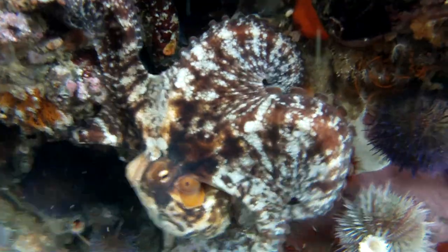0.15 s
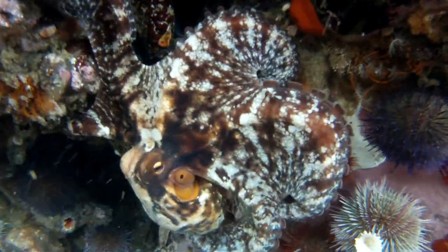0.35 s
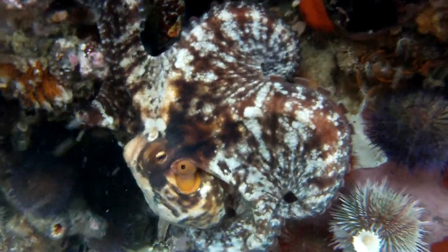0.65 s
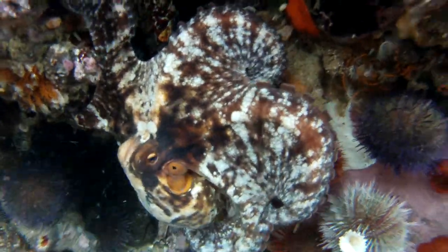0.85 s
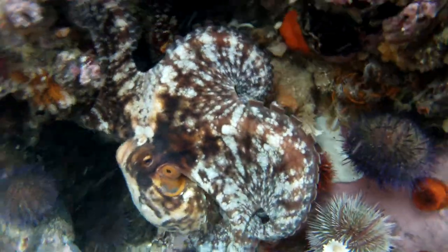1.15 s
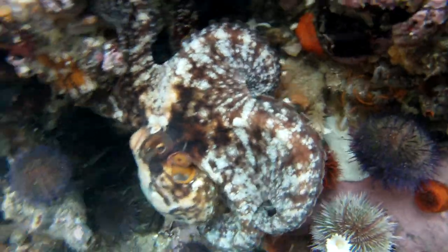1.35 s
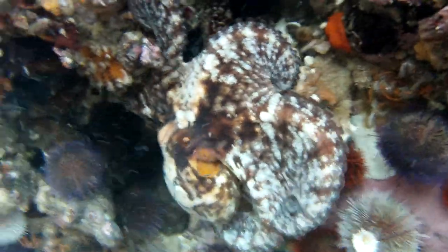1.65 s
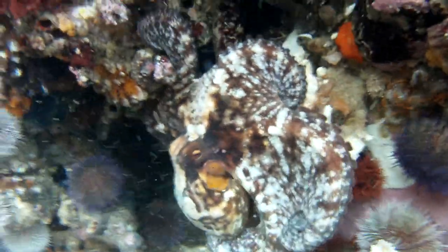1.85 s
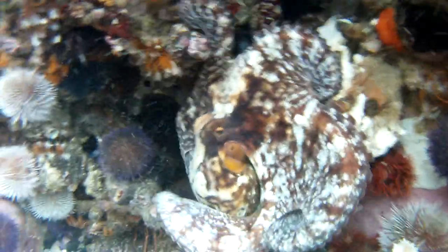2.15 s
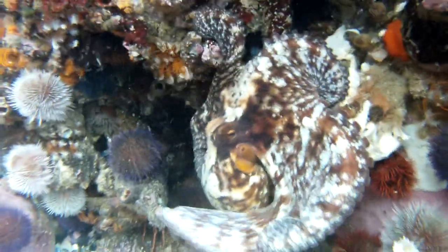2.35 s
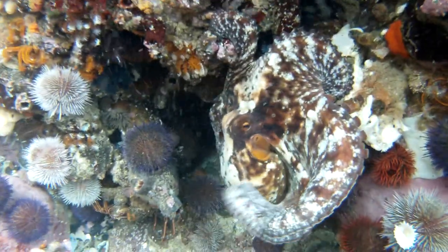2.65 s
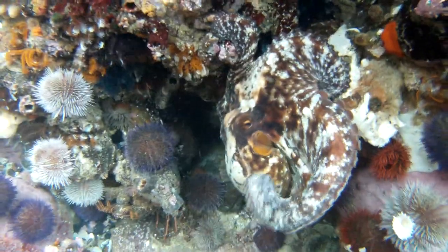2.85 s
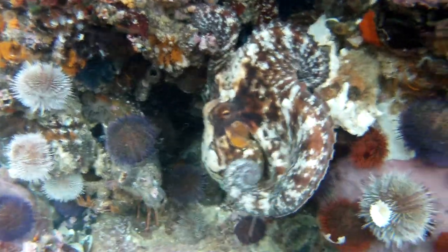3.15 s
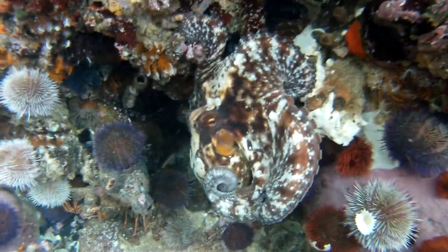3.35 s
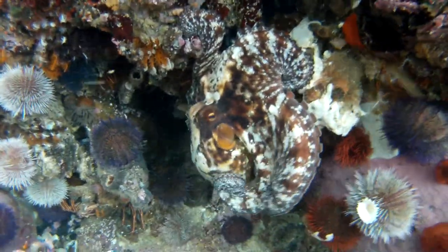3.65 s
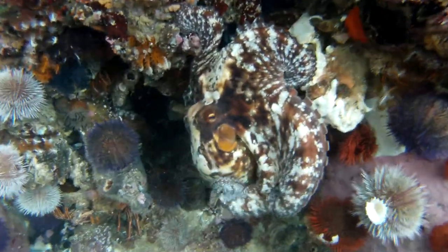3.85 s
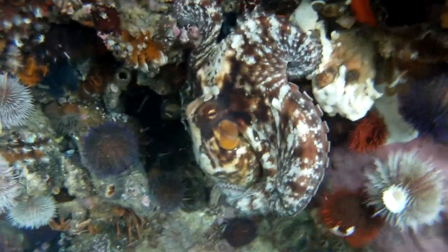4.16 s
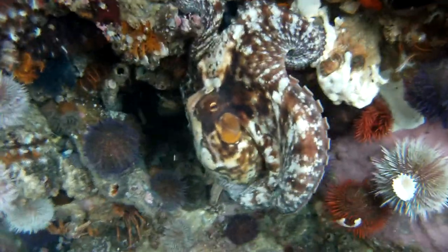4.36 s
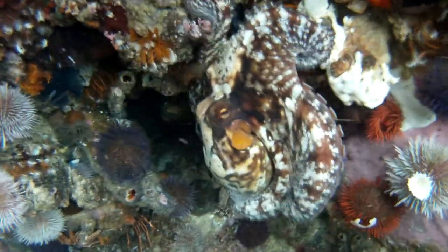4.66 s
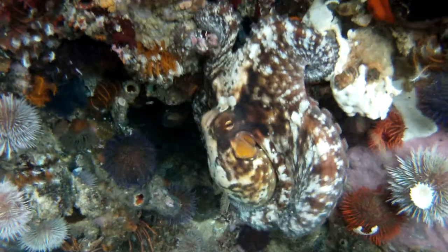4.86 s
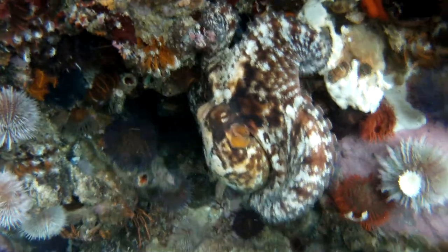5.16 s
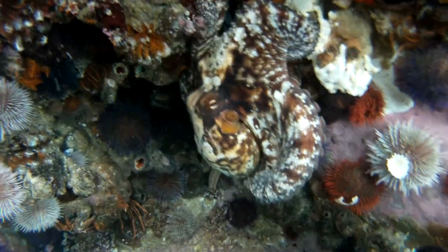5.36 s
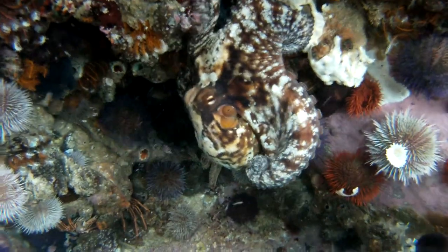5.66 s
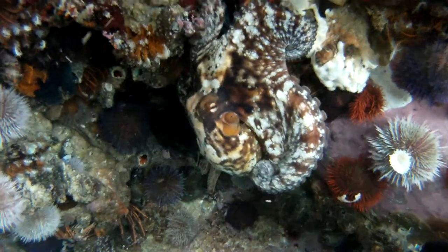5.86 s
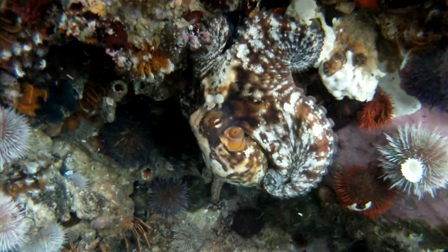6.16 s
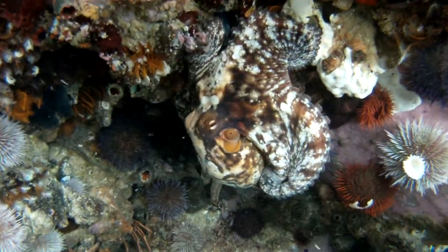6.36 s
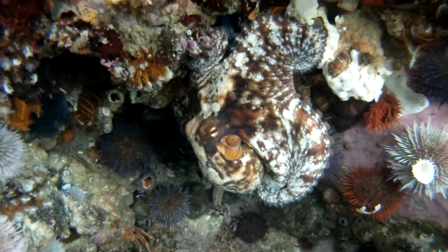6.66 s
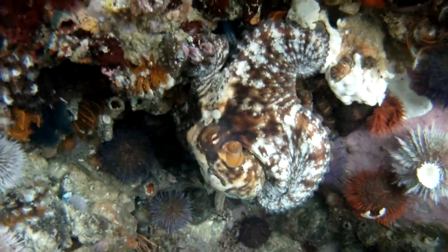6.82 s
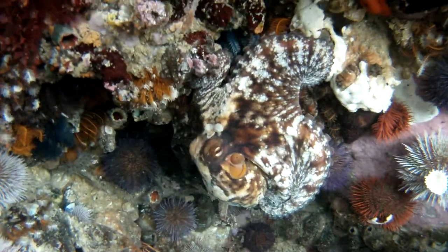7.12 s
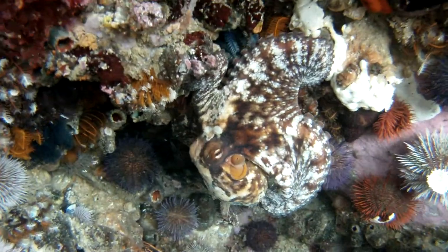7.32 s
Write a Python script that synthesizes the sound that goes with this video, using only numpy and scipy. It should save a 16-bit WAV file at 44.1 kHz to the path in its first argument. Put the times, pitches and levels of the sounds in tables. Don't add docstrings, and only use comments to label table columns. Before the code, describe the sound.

Quiet rocky reef, close and muffled, almost mono, with the gritty, metallic edge of a low-quality recorder. Water rumbles and gurgles under hiss and fine crackling. Hands knock softly on the housing and a rubber seal creaks and chirps at the start. Irregular shrimp snaps ring the walls, some nearer, and one very close crack stands far above everything before it calms to gurgling and sparse ticks.

```python
import sys
import numpy as np
from scipy import signal
from scipy.fft import rfft, irfft
from scipy.io import wavfile
from scipy.ndimage import uniform_filter1d

SR = 44100
rng = np.random.default_rng(int(sys.argv[2]) if len(sys.argv) > 2 else 0)


def gain_from_db(level_db):
    decades = np.asarray(level_db, float) / 20
    return 10 ** decades


def output_pcm(signal):
    pcm = np.clip(np.atleast_2d(signal).T, -1, 1) * 32767
    wavfile.write(sys.argv[1], SR, np.round(pcm).astype(np.int16))


N = 330287
TIME = np.arange(N) / SR

# (frequency [Hz], level [dB per Hz])
HISS = [(20, -91.5), (120, -93.5), (300, -93), (700, -99), (1400, -102), (2800, -105), (4500, -106),
        (7000, -106)]
# (frequency [Hz], level [dB per Hz])
SIDE_HISS = [(20, -118), (150, -113), (1000, -114), (7000, -114)]
# (time [s], level [dB])
REEF_LEVEL = [(0, -68.5), (1, -72), (2.4, -72), (2.8, -69.5), (3.6, -66.5), (4.2, -67.5), (4.7, -65),
              (5, -73.5), (6, -71), (7.49, -74.5)]
# (time [s], level [dB])
SURGE_LEVEL = [(0.0, -61), (0.44, -63.5), (1.08, -55.5), (2.06, -64.5), (2.23, -60.5), (2.67, -65),
               (2.92, -57), (3.04, -59.5), (3.69, -62), (3.88, -58), (4.25, -61), (4.67, -58.5),
               (4.94, -64), (5.65, -61.5), (6.28, -65), (7.49, -64.5)]
# (middle [s], length [s], wash lift [dB], gurgle lift [dB])
EDDIES = [(.55, .3, -1, 2), (1.2, 0.47, 6, -1.5), (2.28, 0.15, 4, 5), (3.05, .25, -3, 1.5),
          (3.8, 0.42, 4, -1), (4.2, .45, 7.5, 0), (4.7, .7, 2.5, 6.5), (5.22, .25, 5, 8.5),
          (5.6, .4, 5, 8.5), (5.9, 0.23, 5.5, 9.5), (7.3, 0.77, 7.5, 5)]
# (frequency [Hz], level [dB], time to fall 60 dB [s])
SEAL_MODES = [(234, -5.5, 0.034), (567, -9, 0.035), (878, 0, 0.03), (1110, -2, 0.014), (1570, -15, 0.019)]
# (start [s], length [s], level [dB], slips [per s])
CREAKS = [
    (.535, 0.075, -57, 126),
    (.634, 0.02, -58, 130),
    (.667, 0.013, -62, 115),
    (.699, 0.041, -60, 118),
    (0.953, 0.039, -58.5, 118),
    (1.01, 0.018, -59.5, 114),
    (1.127, .032, -63.5, 130),
]
# (time [s], peak [dB], start pitch [Hz], end pitch [Hz], length [s])
SQUEAKS = [(.443, -56, 1090, 1000, .03), (.466, -51, 900, 840, .038), (.503, -55, 1130, 1010, .042),
           (.912, -59, 1200, 1080, .028), (1.15, -57, 800, 690, .028), (1.165, -63, 1700, 2300, .025),
           (1.187, -48, 770, 960, .027), (1.198, -52, 1000, 1130, .018), (.97, -57, 95, 110, .3),
           (3.72, -53, 52, 72, .3), (4.05, -51, 82, 68, .3)]
# (time [s], peak [dB], frequency [Hz], swell time [s])
KNOCKS = [(.146, -38, 140, 0.0032), (0.1768, -29, 144, 0.003), (0.386, -49, 108, .005),
          (0.389, -49, 302, 0.0023), (2.239, -32.5, 163, 0.005), (2.238, -50, 300, 0.0022),
          (4.077, -48, 290, 0.0045), (2.273, -42, 70.4, 0.0049), (2.259, -51, 242, 0.0078),
          (2.96, -45, 94, 0.0078), (3.453, -45, 99, 0.0053), (3.991, -46, 60.4, 0.0054),
          (4.075, -32.5, 153, 0.003), (4.49, -48, 111, .008), (4.70, -49, 158.5, 0.0088),
          (4.862, -44, 187, .006), (5.08, -49, 224, .008), (5.204, -59, 180, .006),
          (5.53, -52.5, 200.2, 0.0066), (5.81, -55.5, 202, 0.009), (6.53, -47, 70, 0.0066)]
# (frequency [Hz], level [dB], time to fall 60 dB [s])
WALL_MODES = [(600, -14, .04), (900, -15, .022), (1090, -14, .02), (1550, -15, .014), (1950, -8, .012),
              (2450, -6, .010), (2720, -.5, .011), (3350, -2.5, .010), (3520, -1.5, .011), (3780, -3, .010),
              (4300, -5, .008), (4850, -7, .008), (5200, -9, .007), (5560, -4, .008)]
# (time [s], peak [dB], centre [Hz], burst length [s])
RASPS = [
    (0.431, -53, 2100, .004),
    (0.635, -50, 900, .001),
    (.6995, -51, 900, .001),
    (.903, -55.5, 1390, .012),
    (0.927, -61, 1500, .0065),
    (.9535, -50, 900, .001),
    (1.132, -54, 1050, 0.0071),
    (1.168, -59, 2000, .01),
    (1.187, -59, 1500, .008),
]
# (time [s],
# peak [dB], centre [Hz], burst length [s])
TAPS = [(0.394, -54, 619, .0033), (0.43, -48.5, 600, 0.0024), (3.153, -48, 600, .0089),
        (3.644, -49, 552, .0033), (3.71, -44.5, 630, 0.0034), (3.976, -50.5, 589, .003),
        (4.045, -46, 606, 0.0014), (5.212, -54, 458, 0.0032), (5.421, -55, 546, 0.0023),
        (6.536, -57, 673, .0033), (4.934, -36.5, 641.5, .001)]
# (time [s], peak [dB], centre [Hz], bare crack [dB])
TICKS = [
    (0.327, -57.5, 3340, 4),
    (0.4863, -48.5, 3750, 3),
    (1.527, -62, 3110, 15),
    (2.06, -50, 3460, 12),
    (2.094, -58, 3390, 8),
    (2.219, -65, 4140, 4),
    (3.5324, -39.5, 3530, 0),
    (5.1175, -45.5, 3500, 15.5),
    (6.169, -57, 3010, 4),
    (6.87, -48, 3900, 10.5),
]
# (time [s], peak [dB], centre [Hz], bare crack [dB])
SNAPS = [(0.7158, -44.5, 3630, -7), (0.81, -57, 3230, -7), (1.123, -56.5, 2650, -9),
         (1.1717, -51, 3360, 11), (1.197, -55, 2610, -7), (1.8804, -55, 2420, -7), (2.0328, -48, 3300, -4),
         (2.3433, -44.5, 3450, -13), (2.802, -41, 3570, 0), (4.013, -51, 2600, -5), (4.0731, -52, 2670, -7),
         (4.641, -49, 2600, -6.5), (4.778, -50, 2540, 6.5), (4.8817, -41.5, 2640, 3),
         (5.4294, -58, 2507, -7), (5.663, -51, 3480, 11), (6.6498, -51.5, 3350, -7)]
# (time [s], peak [dB], centre [Hz], spread [octaves], burst length [s])
NEAR_SNAPS = [(3.093, -48, 3000, .6, .002), (3.0949, -30.5, 3300, 0.92, 0.0043),
              (3.103, -40, 3600, .44, .0015), (3.111, -44, 3000, .8, .0012),
              (3.9764, -27.5, 3680, 0.37, 0.00035), (3.9768, -30, 2620, 0.23, 0.00054),
              (3.984, -48, 2650, .2, .002), (4.0437, -34.5, 2420, 0.28, 0.0011),
              (4.044, -41, 1500, 0.37, 0.0016), (3.9782, -37.5, 1860, 0.27, 0.00055),
              (3.9772, -40.5, 3960, .12, 0.0007), (3.096, -45.5, 1900, 0.2, 0.0022)]
# (time [s], level [dB])
CLOSE_BLOWS = [
    (4.93355, 0),
    (4.93456, -9.8),
    (4.93538, -18),
    (4.93603, -12.5),
]
# (frequency [Hz], level [dB], time to fall 60 dB [s], first swing [+1 or -1])
CLOSE_MODES = [(650, -13.9, .003, -1), (912, -23, .036, 1), (1079, -10.8, .0164, 1), (1501, -30.7, .03, 1),
               (2062, -33, .035, 1), (2455, -14.2, .0188, -1), (2565, -4.4, .0202, -1),
               (3243, -9.6, .0123, 1), (3457, -2.2, .0266, -1), (3734, -9.8, .0098, 1),
               (4250, -22, .014, -1), (5160, -9, .006, -1), (5461, -12, .012, 1), (5750, -8, .008, -1)]


def curve(table):
    return np.interp(TIME, *np.transpose(table))


def coloured(points):
    hz, db = np.transpose(points)
    bins = np.arange(N // 2 + 1) * SR / N + 1
    shape = gain_from_db(np.interp(np.log(bins), np.log(hz), db))
    return irfft(rfft(rng.standard_normal(N)) * shape, N) * np.sqrt(SR / 2)


def ring(x, modes):
    out = np.zeros(len(x))
    for k, (hz, db, t60) in enumerate(modes):
        decay = np.exp(-np.log(1000) / (t60 * SR))
        turn = 2 * np.pi * hz / SR
        feedback = [1, -2 * decay * np.cos(turn), decay * decay]
        out += (-1) ** k * gain_from_db(db) * signal.lfilter([0, decay * np.sin(turn)], feedback, x)
    return out


def band(x, lo_hz, hi_hz):
    y = signal.sosfilt(signal.butter(2, [lo_hz, hi_hz], "bandpass", fs=SR, output="sos"), x)
    return y / np.sqrt(np.mean(y ** 2))


def add(track, s, sound, db):
    i = int(s * SR)
    track[i:i + len(sound)] += (gain_from_db(db) * sound / np.abs(sound).max())[:N - i]


def grains(rate, scatter_db):
    size = np.minimum(rng.exponential(size=N), 3)
    return (rng.random(N) < rate / SR) * rng.standard_normal(N) * gain_from_db(scatter_db * size)


def hiss():
    return coloured(HISS), coloured(SIDE_HISS)


def reef():
    far_modes = [(600, 0.5, 0.017), (1106.4, -3.5, 0.019), (1930, 3.5, 0.0039),
                 (2600, -3.5, 0.0097), (3600, -3.0, .008)]
    crackle = ring(grains(900, 3.6), far_modes)
    return gain_from_db(curve(REEF_LEVEL)) * crackle / np.std(crackle)


def surge():
    surge_db = curve(SURGE_LEVEL)
    above_mean_db = surge_db + 59
    wash_db = -65.5 + 0.59 * above_mean_db
    gurgle_db = -69.5 + 0.3 * above_mean_db
    for s, length, wash_lift_db, gurgle_lift_db in EDDIES:
        passing = np.exp(-(2 * (TIME - s) / length) ** 2)
        wash_db = wash_db + wash_lift_db * passing
        gurgle_db = gurgle_db + gurgle_lift_db * passing
    deep = gain_from_db(surge_db + 4.5) * band(rng.standard_normal(N), 22, 49)
    wash = gain_from_db(wash_db) * band(grains(300, 2.5), 56, 135)
    gurgle = gain_from_db(gurgle_db) * band(grains(680, 1.6), 140, 250)
    return deep + wash + gurgle


def squeak(hz):
    waver = 1 + .7 * uniform_filter1d(rng.standard_normal(len(hz)), 150)
    phase = 2 * np.pi * np.cumsum(hz * waver) / SR
    return np.sin(phase) + gain_from_db(-14.5) * np.sin(2 * phase) + gain_from_db(-39) * np.sin(3 * phase)


def creak():
    grip_s, let_go_s, sag_db_per_s = 0.0027, 0.0072, 33
    slips = np.zeros(N)
    rubbing, chance = rng.standard_normal((2, N))
    uneven = gain_from_db(1.5 * chance)
    wander = 1 + 2.2 * uniform_filter1d(rubbing, 200)
    for s, length, db, rate in CREAKS:
        u = TIME - s
        left = length + let_go_s - u
        on = (u > 0) & (left > 0)
        fade = np.clip(np.minimum(.5 + u / grip_s, left / let_go_s), 0, 1)
        grip = fade * gain_from_db(db - sag_db_per_s * u * on)
        phase = np.cumsum(on * rate / SR * wander)
        count = np.floor(np.maximum.accumulate(phase) + .9)
        slip = np.diff(count, prepend=0) * on
        slips += grip * (slip * uneven + 0.063 * on * rubbing)
    out = gain_from_db(6.0) * ring(slips, SEAL_MODES)
    for s, db, start_hz, end_hz, length in SQUEAKS:
        t = TIME[:int(length * SR)]
        hz = start_hz + (end_hz - start_hz) * t / length
        add(out, s, squeak(hz) * np.sin(np.pi * t / length), db)
    return out


def knocks():
    out, t = np.zeros(N), TIME[:6000]
    for s, db, hz, swell in KNOCKS:
        add(out, s, -np.sin(2 * np.pi * hz * t) * t * np.exp(-t / swell), db)
    return out


def snaps(table):
    out, t = np.zeros(N), TIME[:3000]
    crack_band = signal.butter(2, [1850, 9300], "bandpass", fs=SR, output="sos")
    for s, db, hz, spread, length, crack_db in table:
        modes = [(f, g - 6 * (np.log2(f / hz) / max(spread, .1)) ** 2, t60) for f, g, t60 in WALL_MODES]
        burst = rng.standard_normal(len(t)) * np.exp(-t / max(length, .0002))
        burst[0] += 6.0
        add(out, s, ring(burst, modes), db)
        add(out, s, signal.sosfilt(crack_band, burst), db + crack_db)
    return out


def clicks():
    # time [s], peak [dB], centre [Hz], spread [octaves], burst length [s], bare crack [dB]
    rasps = [(s, db, hz, 0.28, length, -18) for s, db, hz, length in RASPS]
    taps = [(s, db, hz, 0.66, length, -26.5) for s, db, hz, length in TAPS]
    ticks = [(s, db, hz, 0.43, 0.0003136, crack) for s, db, hz, crack in TICKS]
    shrimp = [(s, db, hz, 0.34, 0.00084, crack) for s, db, hz, crack in SNAPS]
    near = [(*row, -24.5 + 36 * row[3]) for row in NEAR_SNAPS]
    return snaps(rasps) + snaps(taps) + snaps(ticks) + snaps(shrimp) + snaps(near)


def close_snap():
    out, start = np.zeros(N), int(CLOSE_BLOWS[0][0] * SR)
    t = TIME[start:start + 4000]
    for s, blow_db in CLOSE_BLOWS:
        u = np.maximum(t - s, 0)
        for hz, db, t60, swing in CLOSE_MODES:
            tone = np.sin(2 * np.pi * hz * u) * 1000 ** (-u / t60)
            out[start:start + 4000] += swing * gain_from_db(blow_db + db) * tone
    spray = np.exp(-(t - t[0]) / 0.0032) * rng.standard_normal(len(t))
    add(out, t[1], ring(spray, WALL_MODES), -26)
    add(out, t[1], band(spray, 300, 6000), -27)
    return gain_from_db(1.95) * signal.sosfilt(signal.butter(2, 220, "highpass", fs=SR, output="sos"), out)


def scene():
    hiss_mid, side = hiss()
    mid = hiss_mid + reef() + surge() + creak() + knocks() + clicks() + close_snap()
    return np.array([mid + side, mid - side])


def roll_off(x):
    return signal.sosfilt(signal.butter(12, 16540, fs=SR, output="sos"), x)


def record(dry):
    smooth = signal.sosfilt(signal.butter(8, 5500, fs=SR, output="sos"), dry)
    slow = np.clip(signal.resample_poly(smooth, 40, 147, axis=1), -1, 1)
    held = signal.resample_poly(np.repeat(slow, 4, axis=1), 147, 160, axis=1)
    held = np.pad(held, ((0, 0), (0, 8)))[:, :N]
    top = signal.ellip(7, .5, 34, 15190, fs=SR, output="sos")
    return roll_off(signal.sosfilt(top, held))


dry = scene()
out = record(dry)
output_pcm(out)
```